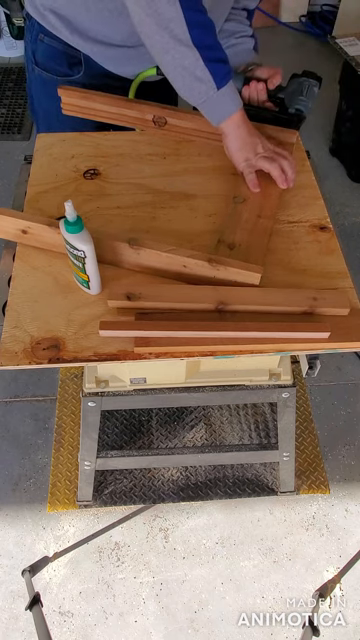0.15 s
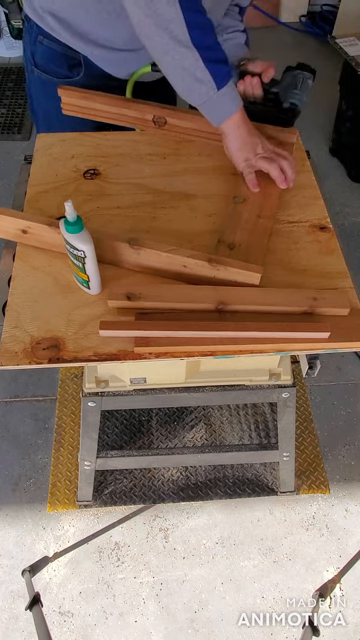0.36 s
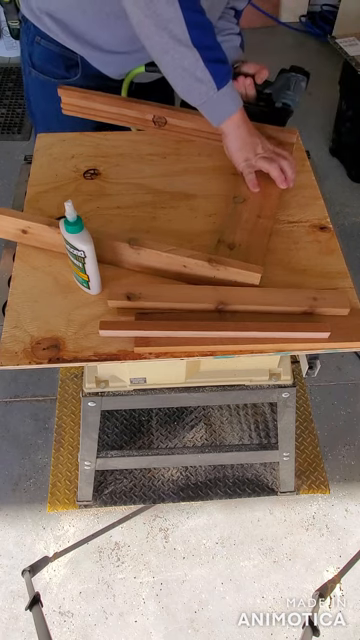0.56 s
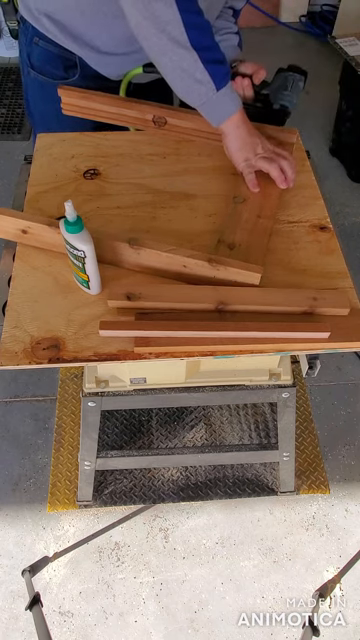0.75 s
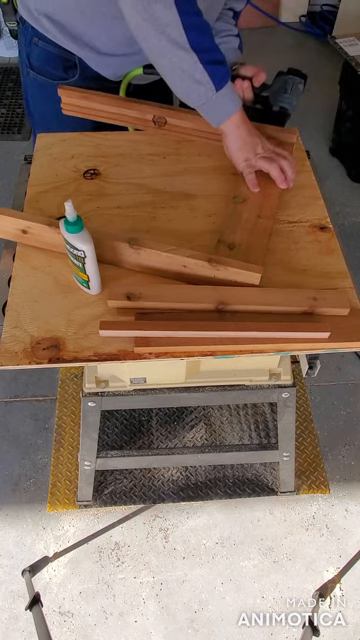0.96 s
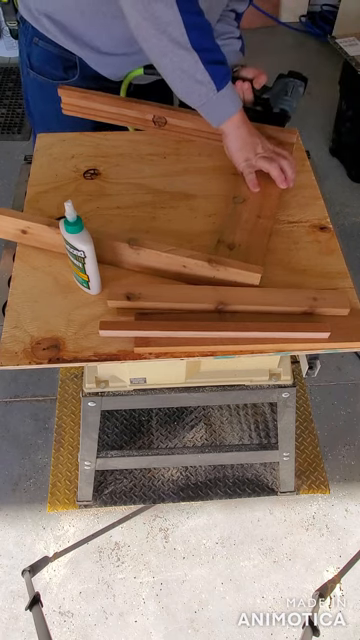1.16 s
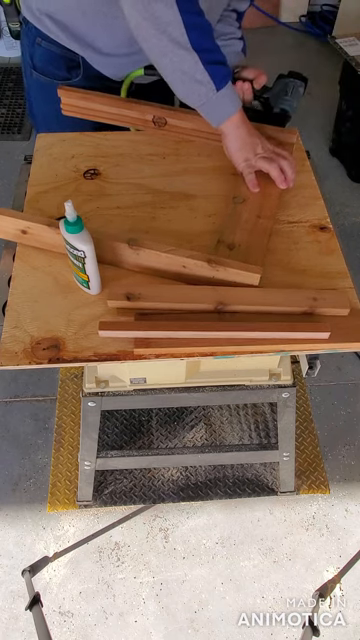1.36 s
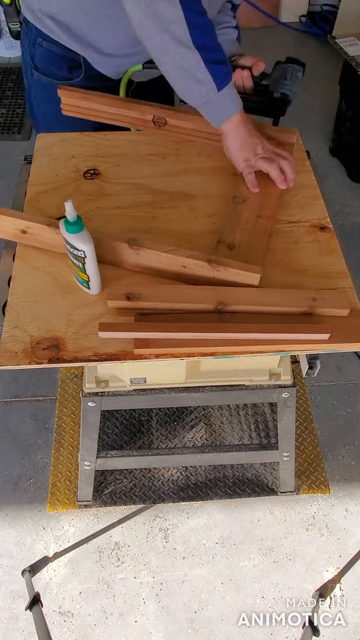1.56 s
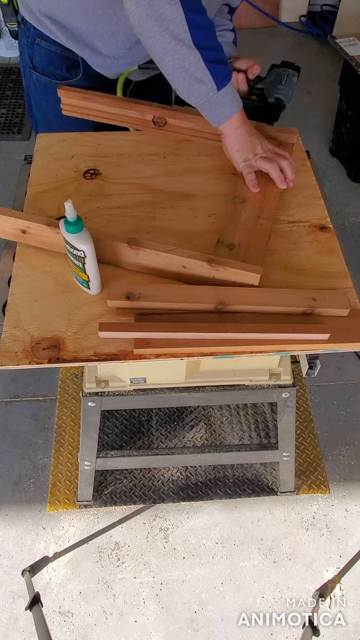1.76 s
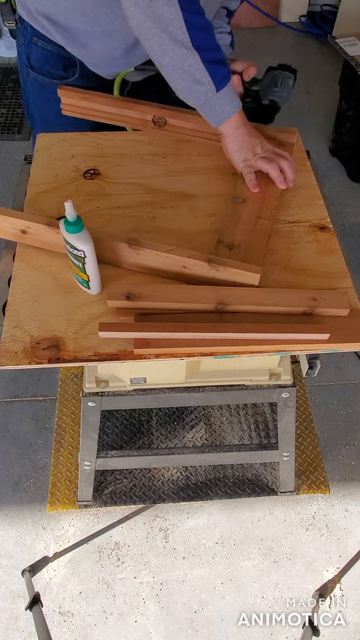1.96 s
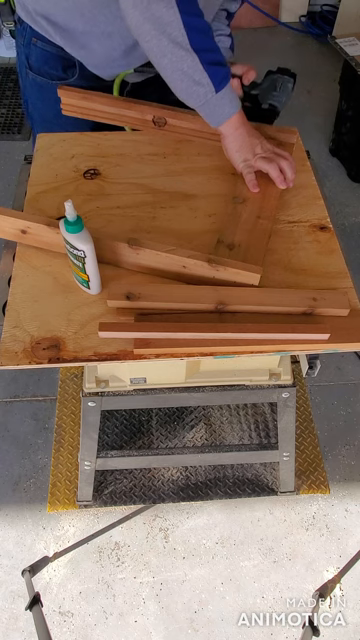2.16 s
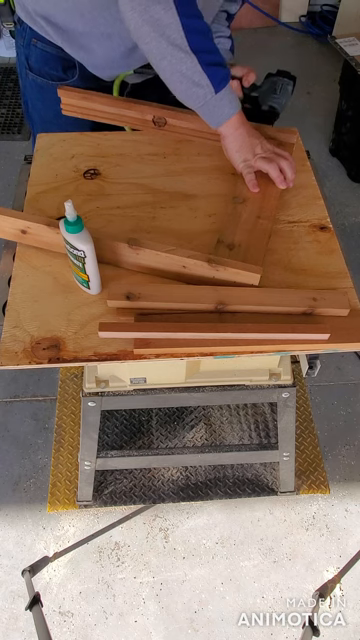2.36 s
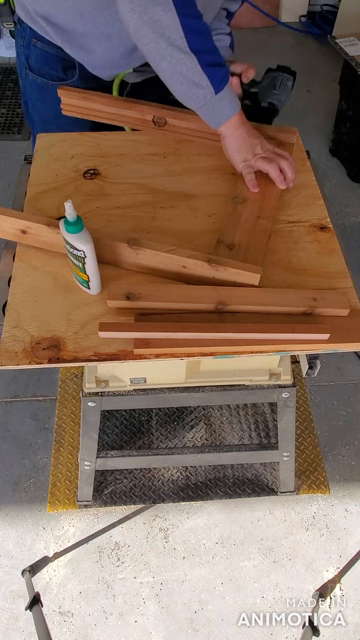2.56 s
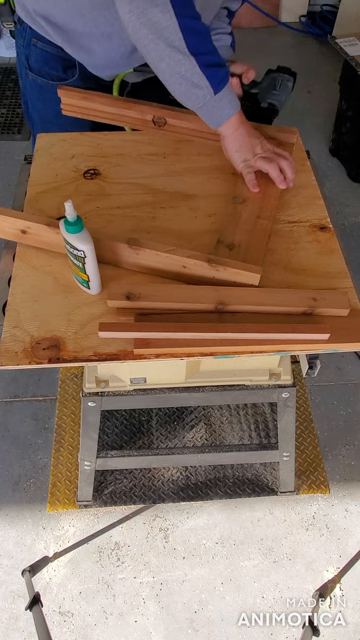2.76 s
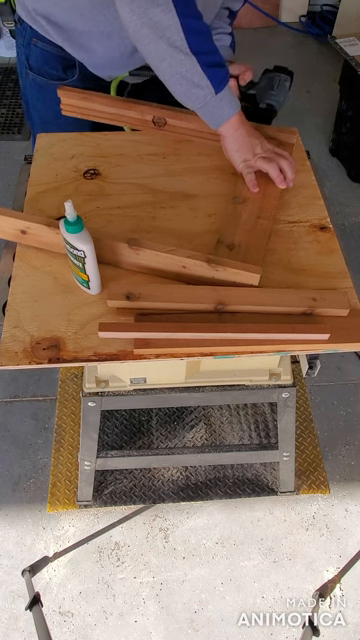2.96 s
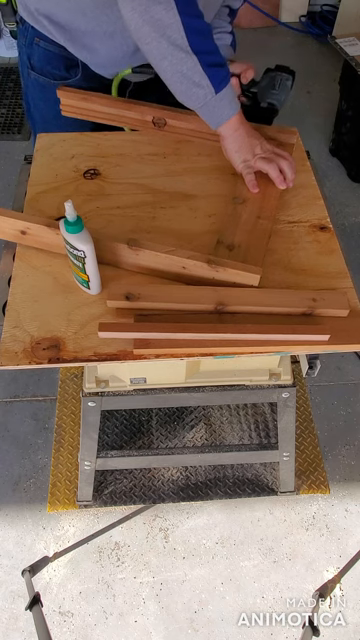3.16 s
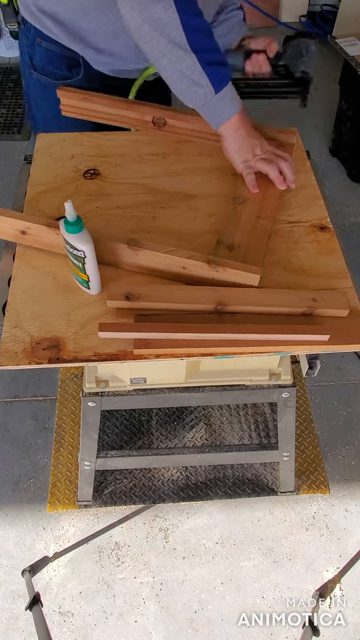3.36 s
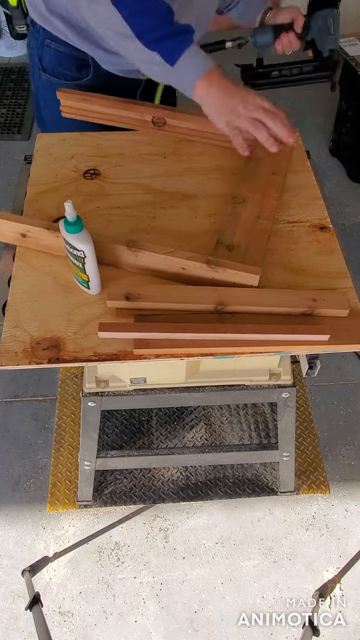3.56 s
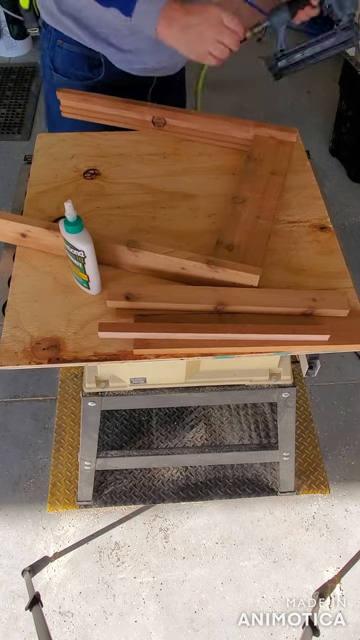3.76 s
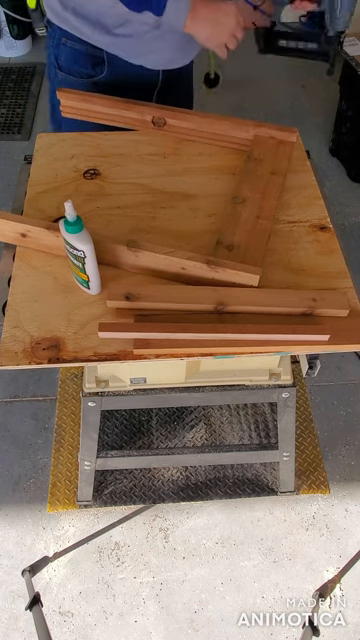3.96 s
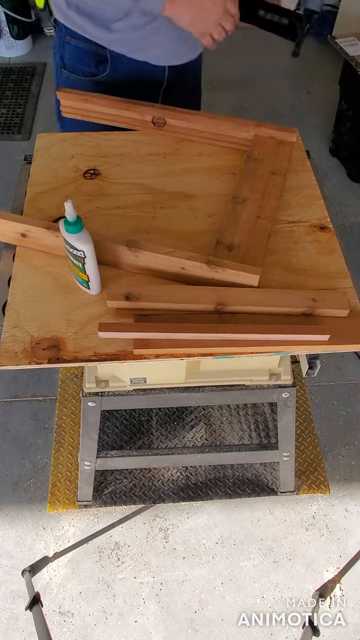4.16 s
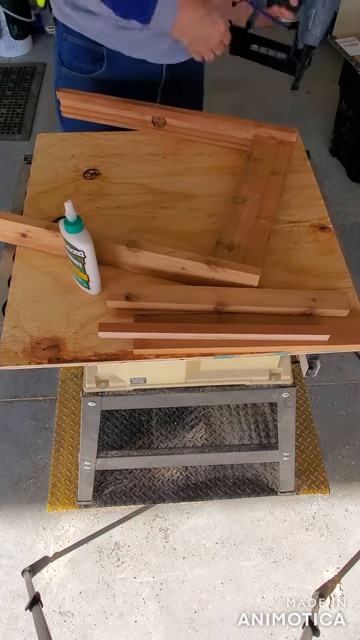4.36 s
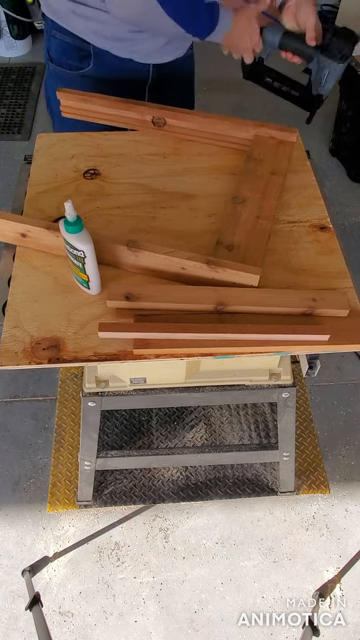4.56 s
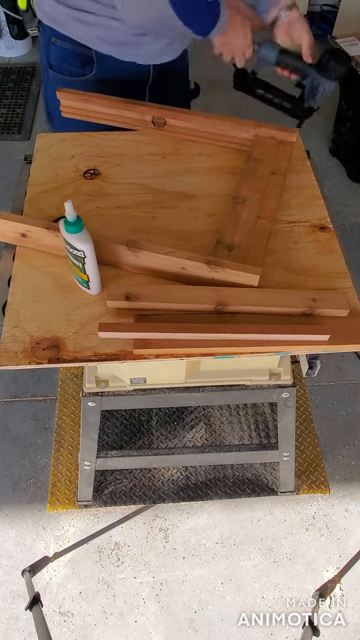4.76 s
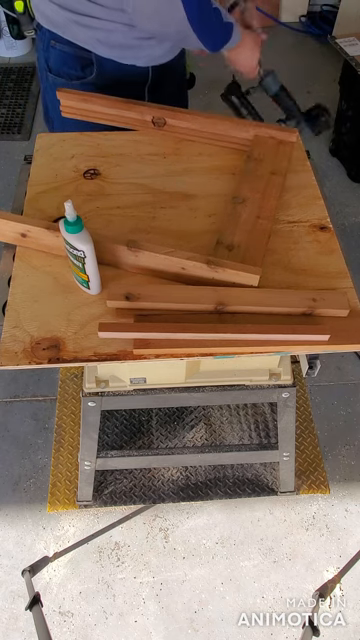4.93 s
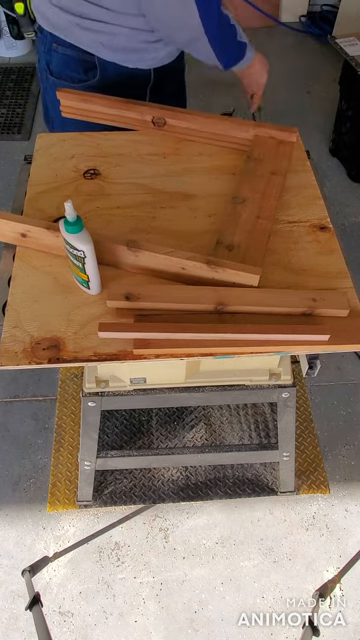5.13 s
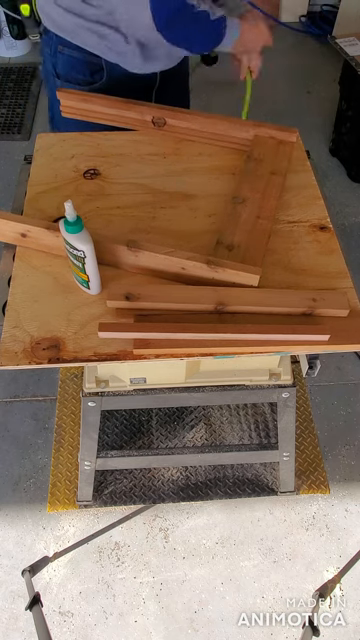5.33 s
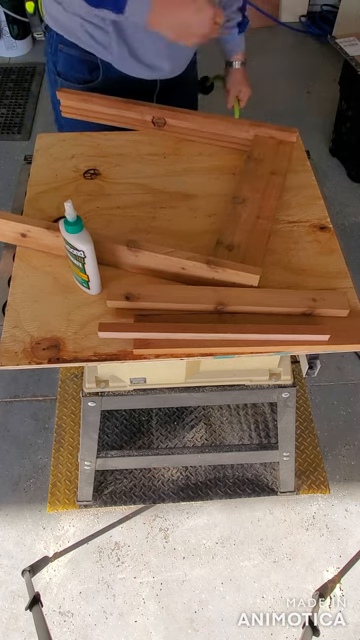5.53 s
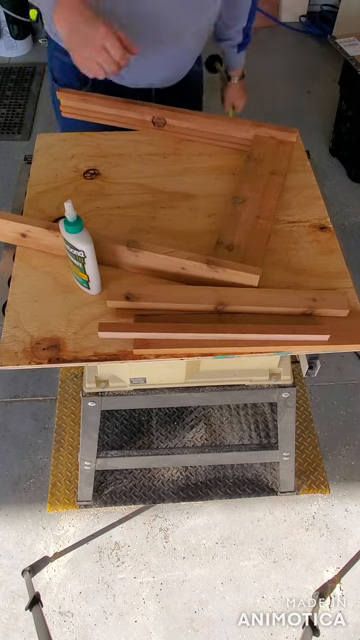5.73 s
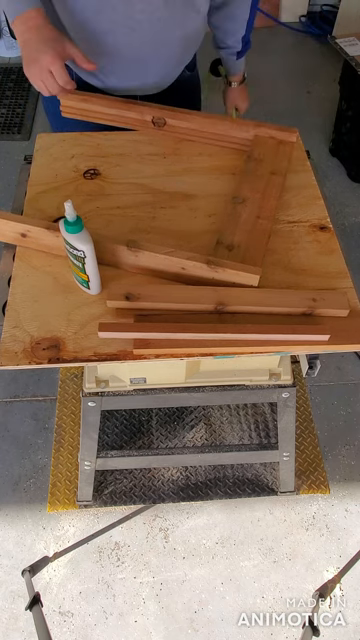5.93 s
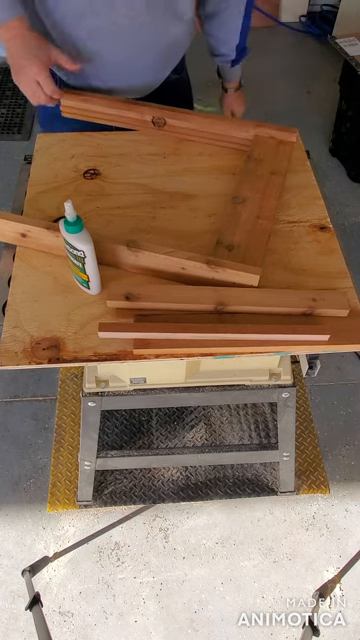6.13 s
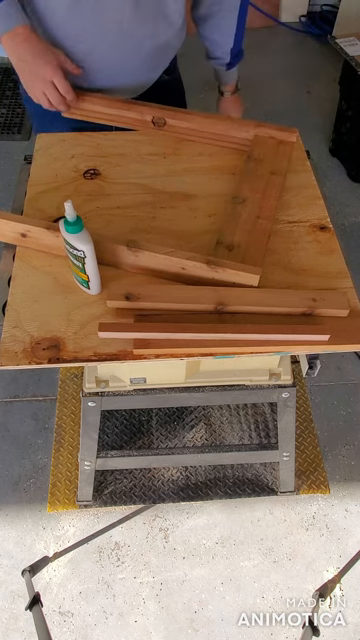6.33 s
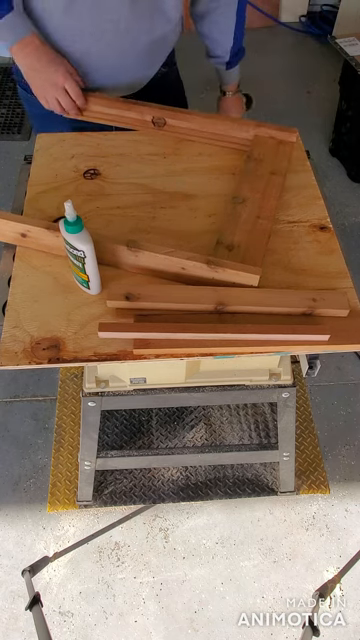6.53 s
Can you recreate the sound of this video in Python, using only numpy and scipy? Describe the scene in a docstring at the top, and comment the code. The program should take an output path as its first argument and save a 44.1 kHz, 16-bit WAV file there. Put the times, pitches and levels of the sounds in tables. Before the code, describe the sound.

A pneumatic stapler fires three hard shots into wooden boards on a bench, each a short valve hiss, crack, roar of air and bright exhaust puff. Boards tap and slide faintly between them. Afterwards a metallic latch clack, soft cloth rubs, faint falling whistles, and the tool knocking down on the floor. Close stereo pickup in a live garage, low hum beneath, shots flattened by limiting.

```python
"""Three hard staple shots into a wooden frame: valve hiss, crack, roar of air and a bright exhaust puff.
Boards tap and slide, wood knocks, steel ticks, the tool's latch clacks and the tool is set down on the floor.
Thin hisses, rubbing cloth and faint falling whistles lie around this; hum and workshop air swell and sink.
Noise bursts, ringing modes and sines make the sources; bench scatter and garage echo carry the tool, boards
and whistles. A limiter flattens the peaks."""
import sys
import numpy as np
from scipy import signal
from scipy.fft import rfft, irfft, next_fast_len
from scipy.io import wavfile
from scipy.ndimage import uniform_filter1d

SR = 44100
rng = np.random.default_rng(int(sys.argv[2]) if len(sys.argv) > 2 else 0)


def to_wav(sig):
    """Store sig (one row per channel, or 1-D mono) as 16-bit WAV at the path in sys.argv[1].

    Samples outside -1..1 are clipped; the rate is SR.
    """
    pcm = np.clip(np.atleast_2d(sig), -1, 1) * 32767
    pcm = np.round(pcm).astype(np.int16)
    wavfile.write(sys.argv[1], SR, pcm.T)  # frames by channels


N = 290619
TIME_S = np.arange(N) / SR

# Source levels are those ahead of the room paths and limiter.
# Staple shots. Each row: blow in seconds, valve lead in seconds, valve level in dB, crack level in dB,
# board level in dB, housing ring in Hz, trigger hold in seconds, roar level in dB,
# nose resonance in Hz, its width in Hz, its level in dB.
SHOTS = [(0.14, 0.029, -22, -10.5, -31, 1280, 0.1, -15.5, 1567, 480, -21.5),
         (1.412, 0.025, -36, -7, -37.5, 1260, 0.096, -14, 2958, 2200, -13.5),
         (3.135, 0.02, -24, -10.5, -27.5, 1400, 0.088, -16.5, 1450, 330, -20)]
# Tool or hand on wood. Each row: start in seconds, level in dB, dull above Hz, bench boom in dB.
KNOCKS = [(0.128, -21.5, 3100, -62), (1.201, -61, 1327, -60), (1.41, -23, 9100, -41),
          (2.936, -26, 2970, -37.5), (3.124, -26, 4590, -53), (3.616, -61.5, 692, -50.5),
          (6.388, -31, 2500, -54)]
# Small steel parts. Each row: start in seconds, level in dB.
CLICKS = [(0.072, -27.5), (2.936, -22.5), (3.062, -29), (4.517, -16.5), (5.165, -43.5)]
# Tool body at the latch, then on the floor. Each row: start in seconds, level in dB, dull above Hz,
# hollow ring in Hz, ring level in dB, thud level in dB.
CLACKS = [(4.521, -28, 14100, 636, -40.5, -61), (4.530, -21, 13800, 626, -38, -84),
          (6.228, -24, 3000, 560, -32, -30), (6.235, -16, 7260, 653, -33, -37.5)]
# Boards shifting under the hand. Each row: start in seconds, slide level in dB.
SHIFTS = [(0.05, -52), (0.658, -60), (0.867, -65), (0.98, -74), (1.076, -67.5), (2.138, -65), (2.312, -77),
          (2.545, -80.5), (2.69, -81), (2.905, -58.5)]
# Thin hisses, probably air in the hose. Each row: start in seconds, length in seconds, centre in Hz,
# width in Hz, level in dB.
HISSES = [(3.55, 0.45, 2170, 400, -86), (5.228, 0.06, 7380, 220.5, -69.5)]
# Faint falling whistles, like a bird outside. Each row: start in seconds, level in dB.
WHISTLES = [(4.38, -88), (5.17, -70.5), (5.561, -67), (6.004, -67.5)]
# Sleeve and hose rubs. Each row: start in seconds, length in seconds, level in dB.
RUBS = [(4.836, 0.019, -60.5), (5.167, 0.14, -57), (5.73, 0.014, -64)]
# Joint swells of hum, air and hiss. Each row: start in seconds, end in seconds, rise time in seconds,
# strength as a factor on the swell dB.
SWELLS = [(0, 0.107, 0.0013, 1.1), (2.795, 3.14, 0.11, 1.2), (4.448, 6.586, 0.24, 0.97)]
# Steady hum tones. Each row: frequency in Hz, level in dB relative to the rumble.
HUM_TONES = [(53.5, -8.5), (88, -3), (142, -14.5)]

# Relative noise spectra of the sources. Each row: frequency in Hz, density in dB per Hz.
CRACK_COLOUR = [(60, -18.5), (250, -18), (800, -4.5), (1500, 1), (4300, -4), (6500, -3), (8200, -11),
                (12000, -9), (16000, -26)]
BOARD_COLOUR = [(30, -28), (100, -13), (190, -12.5), (290, 0), (430, -8), (560, -7.5), (750, 0.5),
                (1050, -11), (2500, -36.5)]
ROAR_COLOUR = [(80, -33.5), (400, -17), (750, -12), (1050, -1.5), (1700, 5.5), (2400, -2), (3200, 1),
               (4800, 2.5), (6800, -14), (8000, -18.5), (12000, -11), (16000, -14)]
VALVE_COLOUR = [(100, -12.5), (280, -4.5), (450, -30.5), (950, -25), (1300, -19.5), (4000, -13),
                (6300, -12), (8500, -11.5), (11500, -0.5), (16000, -5)]
EXHAUST_COLOUR = [(80, -17.5), (450, -19.5), (1000, -11.5), (1400, -4), (2300, -5.5), (3800, -6.5),
                  (6800, -5), (7900, -10), (9500, -7), (12000, -3), (15000, -3.5), (16000, 1.5)]
WOOD_COLOUR = [(60, -8), (300, 5), (700, 1), (1000, -6), (2200, -10.5), (5000, -9.5), (16000, -12)]
BOOM_COLOUR = [(25, -18), (70, 0), (130, 0.5), (190, -2.5), (290, 1), (400, -3.5), (700, -14.5),
               (2000, -49)]
CLACK_COLOUR = [(100, -10), (370, -22), (620, 3), (950, -6), (1400, -5), (3000, -2.5), (5500, -5.5),
                (8000, -11.5), (11000, -8), (16000, -7.5)]
SHIFT_COLOUR = [(100, -9.5), (400, 1.5), (620, -1.5), (900, 2.5), (1250, -6), (1650, -1), (1950, -5.5),
                (2300, -2), (3000, -13), (6000, -24), (16000, -35)]
RUB_COLOUR = [(880, -30), (1500, -8), (1810, -3), (2320, -5), (7240, -5.5), (7840, -9.5), (12100, -5),
              (16000, -9.5)]
HUM_COLOUR = [(20, -26), (38, -16.5), (54, -0.5), (66, -7), (83, 5), (102, -8), (142, -10.5), (190, -24.5),
              (280, -23.5), (450, -47), (800, -91.5)]
AIR_COLOUR = [(120, -22.5), (200, -2.5), (440, -9), (600, -5), (850, -4.5), (1300, -12), (2000, -18),
              (3500, -24.5), (4500, -25), (7000, -30), (7600, -34.5), (8300, -20), (9600, -31),
              (15000, -26)]

# Garage decay ahead of the late fade. Each row: frequency in Hz, time to fall 60 dB in seconds.
GARAGE_T60 = [(80, 0.084), (300, 0.51), (700, 0.58), (1500, 0.61), (3000, 0.56), (6000, 0.47),
              (10000, 0.42), (16000, 0.38)]
# Left-right likeness of diffuse sound. Each row: frequency in Hz, correlation from -1 to 1.
LIKENESS = [(60, 1), (300, 0.6), (600, 0.51), (1000, -0.018), (2000, 0.15), (5000, 0.0)]

HOUSING_WIDTH_HZ, HOUSING_DB, HOUSING_T60_S = 230, -36, 0.36
HOUSING_RISE_S, HOUSING_HOLD_S = 0.04, 0.17
# Hiss starts to die this long before the blow; thump is relative to the hiss.
VALVE_GAP_S, VALVE_THUMP_DB = 0.0034, -16.5
EXHAUST_HOLD_S, EXHAUST_DB = 0.026, -14.5
# Piston knocks home this long after trigger release.
RETURN_S, RETURN_DB, RETURN_DULL_HZ, RETURN_BOOM_DB = 0.031, -25, 2450, -39.5
REBOUND_S, REBOUND_DB = 0.0076, -1
SLIDE_S, TAP_DB = 0.042, 1.5  # tap relative to the slide
WHISTLE_S, WHISTLE_START_HZ, WHISTLE_END_HZ, WAVER_RMS_HZ = 0.125, 2006, 1690, 25
RUB_RISE_DB_PER_S, RUB_FALL_DB_PER_S = 214, 130
# Rest level, gain of a full swell at strength 1, sink time constant.
HUM_DB, HUM_SWELL_DB, HUM_SINK_S = -68.5, 17.5, 0.17
AIR_DB, AIR_SWELL_DB, AIR_SINK_S = -89.5, 27, 0.32
HISS_DB, HISS_SWELL_DB, HISS_SINK_S = -98, 10.5, 0.2
LEFT_LEAD_SAMPLES = 12
CUTOFF_HZ = 16000


def blows():
    """The driver cracks into the staple; the board booms and the air sets the housing ringing."""
    out = np.zeros(N)
    for s, _, _, crack_db, board_db, housing_hz, *_ in SHOTS:
        add(out, s, burst(colour(CRACK_COLOUR), crack_db, t60_s=0.0066, hold_s=0.0054))
        add(out, s, burst(colour(BOARD_COLOUR), board_db, t60_s=0.17, hold_s=0.023))
        housing = ringing(housing_hz, HOUSING_WIDTH_HZ, HOUSING_DB, HOUSING_T60_S,
                          HOUSING_HOLD_S, HOUSING_RISE_S)
        add(out, s, housing)
    return out


def roars():
    """Air behind the piston rushes out while the trigger is held, through the resonance of the nose."""
    out = np.zeros(N)
    for s, *_, held_s, roar_db, nose_hz, width_hz, nose_db in SHOTS:
        add(out, s, swell(colour(ROAR_COLOUR), roar_db, held_s, skew=0.3))
        add(out, s, swell(resonance(nose_hz, width_hz), nose_db, held_s, skew=0.95))
    return out


def air_jets():
    """Air thumps and hisses through the trigger valve; the cylinder vents at trigger release."""
    out = np.zeros(N)
    for s, lead_s, valve_db, _, _, _, held_s, *_ in SHOTS:
        hiss = burst(colour(VALVE_COLOUR), valve_db, t60_s=.015, hold_s=lead_s - VALVE_GAP_S, rise_s=.002)
        thump = burst(colour(BOOM_COLOUR), valve_db + VALVE_THUMP_DB, t60_s=.05)
        puff = burst(colour(EXHAUST_COLOUR), EXHAUST_DB, t60_s=0.077, hold_s=EXHAUST_HOLD_S, rise_s=0.0018)
        add(out, s - lead_s, hiss)
        add(out, s - lead_s, thump)
        add(out, s + held_s, puff)
    return out


def knock(db, dull_hz, boom_db):
    """A short woody rap over the boom of the bench."""
    rap = burst(colour(WOOD_COLOUR, dull_hz), db, t60_s=0.06)
    boom = burst(colour(BOOM_COLOUR), boom_db, t60_s=0.2)
    return rap + boom


def knocks():
    """Knocks on wood, the piston's return after each shot, and small steel parts that rebound once."""
    out = np.zeros(N)
    for s, db, dull_hz, boom_db in KNOCKS:
        add(out, s, knock(db, dull_hz, boom_db))
    for s, _, _, _, _, _, held_s, *_ in SHOTS:
        add(out, s + held_s + RETURN_S, knock(RETURN_DB, RETURN_DULL_HZ, RETURN_BOOM_DB))
    for s, db in CLICKS:
        for k in range(2):
            add(out, s + k * REBOUND_S, burst(colour(EXHAUST_COLOUR), db + k * REBOUND_DB, t60_s=0.0088))
    return out


def clacks():
    """Hard contacts on the tool's hollow body: clack, ring and thud."""
    out = np.zeros(N)
    for s, db, dull_hz, ring_hz, ring_db, thud_db in CLACKS:
        add(out, s, burst(colour(CLACK_COLOUR, dull_hz), db, t60_s=0.041, rise_s=0.0019))
        add(out, s, ringing(ring_hz, width_hz=220, level_db=ring_db, t60_s=0.11))
        add(out, s, burst(colour(BOOM_COLOUR), thud_db, t60_s=0.06))
    return out


def slides():
    """A board taps, then wood rubs on wood in a short, grainy stroke."""
    out, wood = np.zeros(N), colour(SHIFT_COLOUR)
    for s, db in SHIFTS:
        add(out, s, burst(wood, db + TAP_DB, t60_s=0.04))
        stroke = swell(wood, db, SLIDE_S, skew=0.2)
        add(out, s, stroke * friction(depth_db=1, rate_hz=230, size=SR))
    return out


def hose_hisses():
    """Narrow bands of noise that grow and ebb."""
    out = np.zeros(N)
    for s, length_s, hz, width_hz, db in HISSES:
        add(out, s, swell(resonance(hz, width_hz), db, length_s, skew=0.64))
    return out


def whistles():
    """Each sine note slides down and wavers at random."""
    out = np.zeros(N)
    phase = np.clip(TIME_S[:SR] / WHISTLE_S, 0, 1)
    glide_hz = WHISTLE_START_HZ + (WHISTLE_END_HZ - WHISTLE_START_HZ) * phase
    for s, db in WHISTLES:
        hz = glide_hz + WAVER_RMS_HZ * noise(resonance(60, width_hz=120))
        tone = np.sin(2 * np.pi * np.cumsum(hz) / SR)
        add(out, s, from_db(db) * np.sin(np.pi * phase) * tone)
    return out


def rub_gain():
    """Each stroke of cloth grows, holds and fades."""
    gain = np.zeros(N)
    for s, length_s, db in RUBS:
        before_s = np.maximum(s - TIME_S, 0)
        after_s = np.maximum(TIME_S - s - length_s, 0)
        gain += from_db(db - RUB_RISE_DB_PER_S * before_s - RUB_FALL_DB_PER_S * after_s)
    return gain


def hum_tones():
    """The clean lines of a motor running somewhere."""
    out = np.zeros(N)
    for hz, db in HUM_TONES:
        out += from_db(db) * np.sqrt(2) * np.sin(2 * np.pi * (hz * TIME_S + rng.random()))
    return out


def background_gain(rest_db, swell_db, sink_s):
    """The level climbs from rest during each swell and settles back after it."""
    lift = np.zeros(N)
    for start_s, end_s, rise_s, strength in SWELLS:
        climb = 1 - np.exp(-np.maximum(TIME_S - start_s, 0) / rise_s)
        sink = np.exp(-np.maximum(TIME_S - end_s, 0) / sink_s)
        lift += strength * climb * sink
    return from_db(rest_db + swell_db * lift)


def from_db(db):
    """Decibels to gain."""
    return 10 ** (np.asarray(db) / 20)


def rms_one(x):
    """Scale to unit power."""
    return x / np.sqrt(np.mean(x ** 2) + 1e-20)


def at_hz(points, hz):
    """Read a table on a log-frequency axis."""
    table_hz, values = np.array(points).T
    return np.interp(np.log(hz), np.log(table_hz), values)


def bins_hz(size):
    """Spectrum bin frequencies, floored at 1 Hz for the logarithm."""
    return np.maximum(np.fft.rfftfreq(size, 1 / SR), 1)


def colour(points, dull_hz=np.inf):
    """Gain by frequency of a spectrum; a soft contact dulls it."""
    return lambda hz: from_db(at_hz(points, hz)) / np.sqrt(1 + (hz / dull_hz) ** 4)


def resonance(centre_hz, width_hz):
    """Gain by frequency of a resonance with steep skirts."""
    return lambda hz: 1 / (1 + ((hz * hz - centre_hz ** 2) / (hz * width_hz)) ** 2)


def noise(shape, size=SR):
    """Random-phase noise of unit power with the given gain by frequency."""
    hz = bins_hz(size)
    spectrum = shape(hz) * np.exp(2j * np.pi * rng.random(len(hz)))
    return rms_one(irfft(spectrum, size))


def diffuse(shape, size):
    """Stereo noise arriving from all sides: alike in the bass, largely unrelated above."""
    padded = next_fast_len(size)
    hz = bins_hz(padded)
    likeness = np.clip(at_hz(LIKENESS, hz), -.99, .99)
    mid, side = rfft(rng.standard_normal((2, padded))) * shape(hz)
    mid, side = mid * np.sqrt(1 + likeness), side * np.sqrt(1 - likeness)
    return rms_one(irfft([mid + side, mid - side], padded)[:, :size])


def envelope(t60_s, hold_s, rise_s):
    """One second of a gain that rises, holds and dies away."""
    t = TIME_S[:SR]
    return (1 - np.exp(-t / rise_s)) * from_db(-60 * np.maximum(t - hold_s, 0) / t60_s)


def evened(x, shape):
    """Keep the phases, hence timing, of a one-second sound; impose a spectrum free of chance resonances."""
    return irfft(shape(bins_hz(SR)) * np.exp(1j * np.angle(rfft(x))), SR)


def burst(shape, level_db, t60_s, hold_s=0., rise_s=.0008):
    """A short burst of noise with a smooth spectrum."""
    gain = envelope(t60_s, hold_s, rise_s)
    # The gain is split around the evening, to trim the noise that spreads in time.
    sound = evened(gain ** .75 * rng.standard_normal(SR), shape) * gain ** .25
    return from_db(level_db) * rms_one(sound) * np.sqrt(np.mean(gain ** 2))


def ringing(hz, width_hz, level_db, t60_s, hold_s=0., rise_s=0.00047):
    """A cluster of close modes, as narrow noise, is set ringing and dies away."""
    return from_db(level_db) * envelope(t60_s, hold_s, rise_s) * noise(resonance(hz, width_hz))


def swell(shape, level_db, length_s, skew):
    """One second holding a rush of noise that grows and ebbs; skew below 1 peaks early."""
    phase = np.clip(TIME_S[:SR] / length_s, 0, 1) ** skew
    return from_db(level_db) * np.sqrt(np.abs(np.sin(np.pi * phase))) * noise(shape)


def friction(depth_db, rate_hz, size):
    """Uneven gain of surfaces that catch and slip, as slow noise in dB."""
    wander = noise(lambda hz: 1 / (1 + (hz / rate_hz) ** 2), size)
    return rms_one(from_db(depth_db * wander))


def add(track, s, sound):
    """Mix a sound in at a time in seconds."""
    start = max(round(s * SR), 0)
    track[start:start + len(sound)] += sound[:N - start]


def garage(late_fade_db=22):
    """Stereo echo: reflections thicken quickly, each band dies at its own rate, faster towards the end."""
    t, centres_hz = TIME_S[:SR], np.array(GARAGE_T60)[:, 0]
    hz = bins_hz(SR)
    reflections, echo = rfft(diffuse(np.ones_like, SR)), 0
    # Each row of the identity matrix makes one triangular band on the log-frequency axis.
    for share, (_, t60_s) in zip(np.eye(len(centres_hz)), GARAGE_T60):
        band = irfft(reflections * np.interp(np.log(hz), np.log(centres_hz), share), SR)
        echo = echo + band * from_db(-60 * t / t60_s)
    echo = echo * (1 - np.exp(-t / 0.011)) * from_db(-late_fade_db * t ** 2)
    return rms_one(echo) / np.sqrt(SR)


def heard(source, direct_db, bench_db, room_db, pan_db):
    """Direct sound reaches the left microphone first; bench scatter and room echo add to it."""
    fade = np.exp(-TIME_S[:SR] / .016)
    scatter = evened(diffuse(np.ones_like, SR) * fade ** 3, np.ones_like) * fade
    scatter = rms_one(scatter) / np.sqrt(SR)
    paths = from_db(bench_db) * scatter + from_db(room_db) * garage()
    paths[0, 0] += from_db(direct_db + pan_db / 2)
    paths[1, LEFT_LEAD_SAMPLES] += from_db(direct_db - pan_db / 2)
    return signal.oaconvolve(source[None], paths, axes=1)[:, :N]


def scene():
    """Tool, boards and whistles through the garage paths, over hum, air, hiss and rubbing cloth."""
    work = heard(blows(), direct_db=-6.5, bench_db=-7.5, room_db=-3.5, pan_db=2.5)
    work += heard(roars(), direct_db=-17.5, bench_db=-2, room_db=-13.0, pan_db=-6.5)
    work += heard(air_jets(), direct_db=-2.0, bench_db=-1, room_db=0.0, pan_db=11.0)
    work += heard(knocks(), direct_db=-8.5, bench_db=-2.5, room_db=-3.5, pan_db=7.5)
    work += heard(clacks(), direct_db=-6.5, bench_db=-4.5, room_db=3.0, pan_db=11.5)
    work += heard(slides() + hose_hisses(), direct_db=-2.5, bench_db=-5.5, room_db=-3.5, pan_db=3)
    far = heard(whistles(), direct_db=-4.0, bench_db=-5.5, room_db=3.5, pan_db=4.0)
    rub = rub_gain() * diffuse(colour(RUB_COLOUR), N) * friction(depth_db=1.5, rate_hz=60, size=N)
    motor = diffuse(colour(HUM_COLOUR), N) + hum_tones()
    hum = background_gain(HUM_DB, HUM_SWELL_DB, HUM_SINK_S) * motor
    air = background_gain(AIR_DB, AIR_SWELL_DB, AIR_SINK_S) * diffuse(colour(AIR_COLOUR), N)
    hiss = background_gain(HISS_DB, HISS_SWELL_DB, HISS_SINK_S) * diffuse(np.ones_like, N)
    return work + far + rub + hum + air + hiss


def limiter(x, ceiling_db, release_db_per_s, attack_s):
    """The gain drops quickly when the power passes the ceiling and recovers steadily."""
    power = uniform_filter1d(np.mean(x ** 2, axis=0), size=176)  # 4 ms
    over_db = np.maximum(10 * np.log10(np.maximum(power, 1e-12)) - ceiling_db, 0)
    release_db = release_db_per_s * TIME_S
    held_db = np.maximum.accumulate(over_db + release_db) - release_db
    pole = np.exp(-1 / (attack_s * SR))
    return x * from_db(-signal.lfilter([1 - pole], [1, -pole], held_db))


def record(dry):
    """The left microphone is fuller in the low mids; a limiter flattens the shots and the top is cut."""
    low_mids = signal.sosfilt(signal.butter(1, [180, 650], "band", fs=SR, output="sos"), dry)
    coloured = dry + .16 * low_mids * [[1], [-1]]
    limited = limiter(coloured, ceiling_db=-14.0, release_db_per_s=158.5, attack_s=.003)
    return signal.sosfilt(signal.ellip(12, .1, 80, CUTOFF_HZ, fs=SR, output="sos"), limited)


dry = scene()
out = record(dry)
to_wav(out)
```